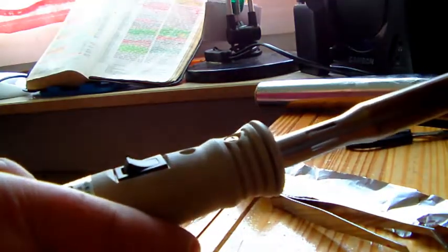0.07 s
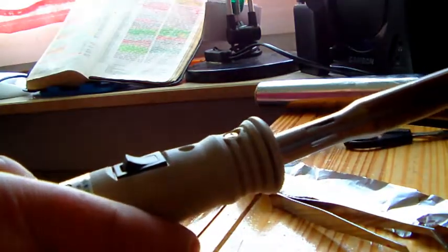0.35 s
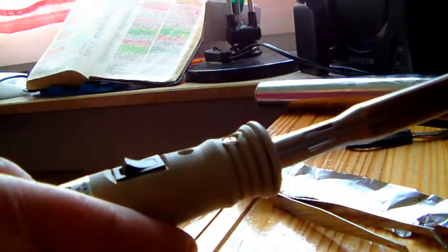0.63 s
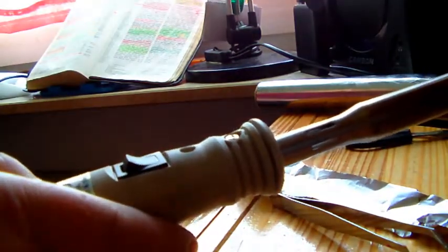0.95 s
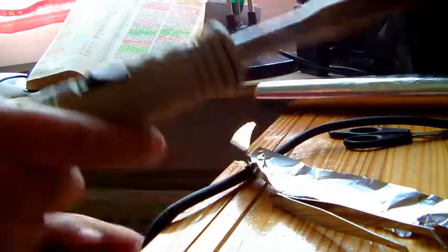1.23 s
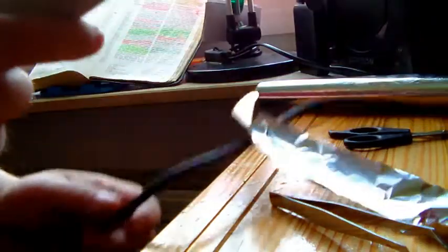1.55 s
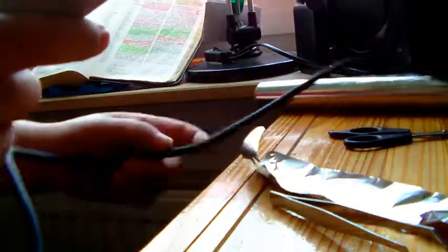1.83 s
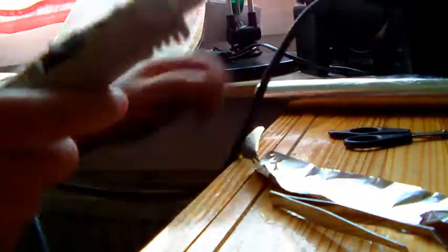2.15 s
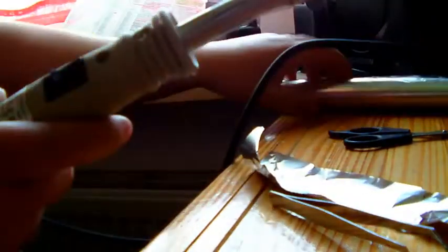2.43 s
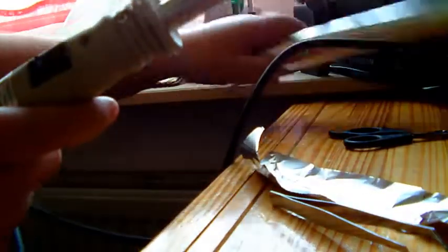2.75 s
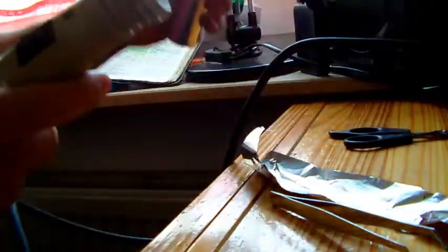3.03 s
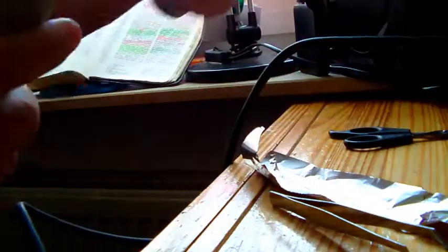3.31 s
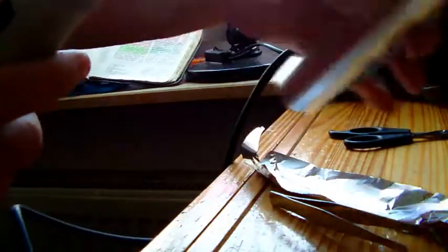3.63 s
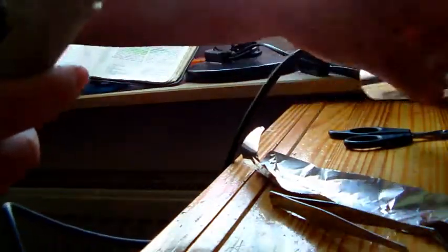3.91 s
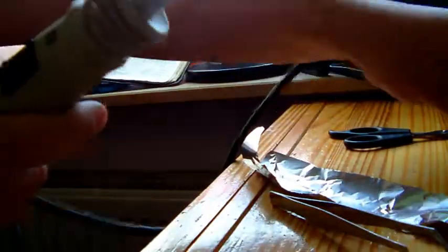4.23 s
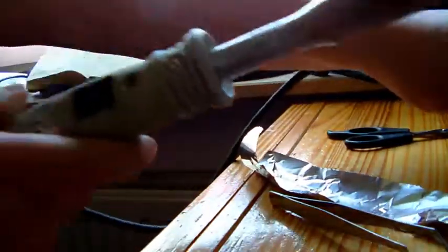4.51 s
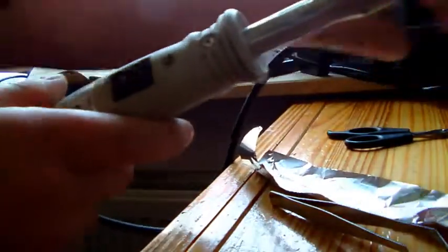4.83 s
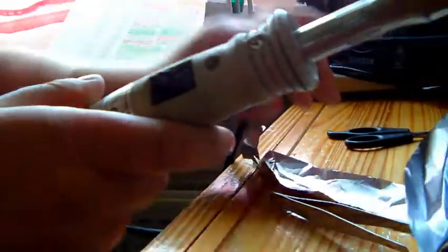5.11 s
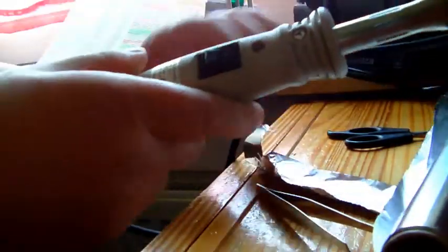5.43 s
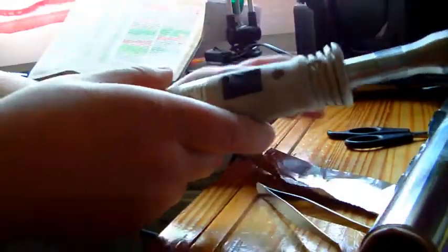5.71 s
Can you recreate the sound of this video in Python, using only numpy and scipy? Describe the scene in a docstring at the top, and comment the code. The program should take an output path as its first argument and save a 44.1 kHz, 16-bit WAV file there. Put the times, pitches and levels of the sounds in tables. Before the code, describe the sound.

In a small room, heard from close by, aluminium foil ticks and crackles as a cord brushes it. A wooden thud leads into louder crinkling as a foil roll is lifted. Its cardboard core gives one hollow tap, then the roll lands with quick rocking knocks and slides briefly amid more crisp snaps. A computer fan hums softly throughout.

```python
"""Foil at a wooden desk

A soldering iron's cord drags over aluminium foil, which buckles in snaps, crumples and faint ticks.
A foil roll is picked up, crinkles in the hand, bumps a shelf, rocks on the desk and slides along it;
the wood thuds and the cardboard core rings. A small computer fan spins up and hums.
Small room, close microphone."""
import sys
import numpy as np
from scipy import signal
from scipy.fft import rfft, irfft, next_fast_len
from scipy.io import wavfile
from scipy.ndimage import map_coordinates

SR = 44100
rng = np.random.default_rng(int(sys.argv[2]) if len(sys.argv) > 2 else 0)


def store_pcm(level_fs):
    """Save levels as 16-bit WAV."""
    pcm = np.round(np.clip(level_fs, -1, 1) * 32767).astype(np.int16)
    wavfile.write(sys.argv[1], SR, np.atleast_2d(pcm).T)


N = 254016
TIME_S = np.arange(N) / SR

# Spectra of fan air, rubbed wood and foil. Each row: frequency in Hz, relative level in dB.
AIR_SPECTRUM = [(30, -29.5), (140, -29), (200, -3), (420, 1.5), (750, 2.5), (1050, -5.5), (1350, -0.5),
                (2400, -11), (2850, -5), (3250, -11), (8000, -17), (11500, -19.5), (13000, -25.5),
                (15500, -17)]
WOOD_SPECTRUM = [(200, -18), (450, 5), (700, 2.5), (1300, 1), (2000, -4.5), (3500, -6), (8000, -14.5)]
FOIL_SPECTRUM = [(30, -27), (150, -27), (400, -20), (1000, -18), (2000, -17.5), (3500, -13), (5500, -8),
                 (6800, -6), (7700, -2), (8800, -2.5), (10500, -9), (12000, -14.5), (13200, -23.5),
                 (15500, -14.5)]
# Strokes over wood. Each row: peak time in seconds, level in dB, rise and fall in seconds per 13 dB.
WOOD_STROKES = [(0.084, -59, 0.027, 0.085), (1.474, -51.5, 0.096, 0.039), (2.012, -50, .008, 0.062),
                (2.217, -36, 0.0018, 0.039), (5.225, -46, 0.047, 0.062), (5.292, -41.5, 0.044, 0.11)]
# Blows on desk and shelf. Each row: start in seconds, peak in dB, pitch in Hz, spread in octaves.
WOOD_KNOCKS = [(1.408, -44, 735, 0.48), (1.455, -43, 743, 0.056), (1.482, -44.5, 740, 0.063),
               (1.597, -38.5, 860, 1.04), (1.856, -28.5, 730, 1.02), (1.864, -37, 840, 0.77),
               (2.2175, -18.5, 396, 0.62), (2.254, -32.5, 383, 0.48), (5.271, -35, 715, .35),
               (5.287, -33, 1120, 0.88)]
# The roll, set down and rocking. Each row: start in seconds, first peak in dB, first gap in seconds,
# hand push in dB per rock, damping in dB per rock squared.
ROLL_ROCKINGS = [(4.2596, -20, .063, 8, 5.0), (4.566, -25, .054, 3, 3.04)]
# Taps on the cardboard core. Each row: start in seconds, peak in dB.
TUBE_TAPS = [(3.0622, -24)]
# Core modes. Each row: frequency in Hz, relative level in dB, ungripped T60 in seconds.
TUBE_MODES = [(697, -8.5, 0.24), (714, -7, 0.058), (812, 5, 0.073), (862, 2, 0.11), (926, 3, 0.056),
              (1080, -14, 0.11), (1640, -10, 0.09), (1867, -11, 0.12), (2260, -5.5, 0.047),
              (2524, -8, 0.034), (3080, -8, 0.039)]
# Foil colour. Each row: time in seconds, tilt at -37 dB in dB per octave, top treble gain in dB.
FOIL_COLOUR = [(1.4, 5.5, 4), (1.6, -0.5, 1), (1.85, -5.5, 0), (2.05, -2, -7), (2.35, -4.5, 5),
               (2.9, -1, -1.5), (3.4, 0, 4), (3.7, -3, -0.5), (4.299, -1.5, 2.5), (4.499, -0.5, 4),
               (5.0, 0, 0), (5.15, -3, 0.5), (5.3, 0, -0.5), (5.55, 1.5, 5.5)]
# Spells of settling foil. Each row: start in seconds, end in seconds, level in dB.
SETTLING_SPELLS = [(1.358, 1.55, -49), (2.249, 2.6, -34.5), (2.699, 3.02, -45.5), (3.074, 3.22, -51),
                   (3.289, 3.65, -49), (3.723, 4.2, -64), (4.471, 4.68, -45), (4.726, 4.96, -64),
                   (5.324, 5.62, -55)]
# Runs of buckles. Each row: centre in seconds, level in dB, Gaussian sigma in seconds.
FOIL_CRUMPLES = [(1.379, -52, 0.015), (1.471, -47.5, 0.031), (1.614, -27.5, 0.0061), (1.792, -40.5, 0.011),
                 (1.81, -35.5, 0.011), (2.034, -49.5, 0.017), (2.224, -22.5, 0.0049), (2.272, -30, 0.0044),
                 (2.338, -31, 0.015), (2.379, -20.5, 0.011), (2.399, -15, 0.01), (2.43, -20, 0.0047),
                 (2.544, -37, 0.041), (2.643, -23, 0.0096), (2.866, -33.5, 0.0028), (2.901, -35.5, 0.0063),
                 (3.45, -42, 0.02), (3.464, -29, 0.0053), (3.654, -46.5, 0.0046), (4.277, -36, .013),
                 (4.368, -43.5, 0.058), (4.49, -47.5, 0.022), (4.578, -32.5, 0.0066), (4.645, -38.5, 0.019),
                 (5.009, -38.5, 0.023), (5.133, -21.5, 0.0099), (5.215, -25.5, 0.0033),
                 (5.305, -41.5, 0.034), (5.415, -38.5, 0.0086), (5.534, -32.5, 0.0051)]
# Single buckles. Each row: start in seconds, level in dB.
FOIL_SNAPS = [(1.6013, -28), (1.7758, -41.5), (1.8545, -39.5), (2.0031, -44), (2.2125, -27.5),
              (2.367, -17.5), (2.5026, -32.5), (2.7259, -50), (2.8306, -43.5), (2.8973, -27),
              (2.9257, -32.5), (3.0057, -46.5), (3.0591, -32.5), (3.1563, -45.5), (3.201, -43),
              (3.295, -42), (3.3536, -48), (3.4056, -46), (3.543, -38.5), (3.5733, -47), (3.6118, -40.5),
              (3.7219, -46.5), (4.2582, -33.5), (4.3096, -35), (4.3619, -32), (4.4106, -33.5),
              (4.4824, -32), (4.5414, -36), (4.5979, -35), (4.7586, -53.5), (4.8487, -49), (4.9903, -30),
              (5.0582, -39.5), (5.1125, -29.5), (5.1395, -18.5), (5.1867, -27), (5.2239, -18.5),
              (5.3702, -37), (5.4098, -31), (5.4379, -38), (5.474, -29), (5.5165, -29), (5.5697, -40.5),
              (5.608, -31.5), (5.6767, -49)]
# Room decay. Each row: frequency in Hz, T60 in seconds.
ROOM_DECAY = [(200, 0.32), (450, 0.19), (1000, 0.21), (4000, 0.3), (9000, 0.14), (15000, 0.16)]
# Microphone dips. Each row: centre in Hz, width in Hz, depth from 0 to 1.
MIC_DIPS = [(308, 39, 0.85), (892, 55, 0.74)]


def amp(db):
    """Decibels to gain."""
    return 10 ** (np.asarray(db) / 20)


def unit(x):
    """Scale to rms 1."""
    return x / np.sqrt(np.mean(x ** 2) + 1e-20)


def along(points, hz):
    """Interpolate (Hz, value) points on a log axis."""
    knots_hz, values = np.transpose(points)
    return np.interp(np.log(hz + 1), np.log(knots_hz + 1), values)


def wobble(steps):
    """Smooth random curve, one knot per whole step."""
    return map_coordinates(rng.standard_normal(int(steps[-1]) + 4), [steps])


def filtered(x, response):
    """Apply a complex frequency response."""
    size = next_fast_len(len(x) + SR // 10)
    return irfft(rfft(x, size) * response(np.fft.rfftfreq(size, 1 / SR)), size)[:len(x)]


def resonance(hz, centre_hz, width_hz):
    """Causal ringing peak of gain 1."""
    return 1j * hz * width_hz / (centre_hz ** 2 - hz ** 2 + 1j * hz * width_hz)


def add(track, start_s, sound):
    """Mix a sound into the track."""
    part = track[max(round(start_s * SR), 0):][:len(sound)]
    part += sound[:len(part)]


def in_room(sound, wet_db, onset_s=0.0078):
    """Direct sound plus a fresh room tail, which starts with the nearest wall."""
    hz, t, noise = signal.stft(rng.standard_normal(SR // 3), SR, nperseg=256)
    decay = amp(-60 * t / along(ROOM_DECAY, hz)[:, None])
    tail = signal.istft(noise * decay, SR, nperseg=256)[1]
    tail *= 1 - np.exp(-(np.arange(len(tail)) / SR / onset_s) ** 2)
    response = amp(wet_db) * tail / np.linalg.norm(tail)
    response[0] = 1
    return signal.fftconvolve(sound, response)


def fan(start_hz=179, full_hz=215.4, spin_tau_s=.78, hum_tau_s=.45, waver_hz=.2):
    """Blade tone climbs over rushing air; its fourth harmonic sweeps through a case resonance."""
    approach = lambda first, last, tau_s: last + (first - last) * np.exp(-TIME_S / tau_s)
    hum_db = approach(-72.5, -59.8, hum_tau_s)
    air_db = approach(-66.5, -62.5, spin_tau_s)
    blade_hz = approach(start_hz, full_hz, spin_tau_s) + waver_hz * wobble(TIME_S * 6)
    phase = 2 * np.pi * np.cumsum(blade_hz) / SR
    case_gain = amp(-9) * np.abs(resonance(4 * blade_hz, centre_hz=797, width_hz=16))
    blades = np.sin(phase) + amp(-15) * np.sin(2 * phase) + amp(-25.5) * np.sin(3 * phase)
    blades += case_gain * np.sin(4 * phase)
    air = unit(filtered(rng.standard_normal(N), lambda hz: amp(along(AIR_SPECTRUM, hz))))
    return amp(hum_db + 0.33 * wobble(TIME_S * 8)) * unit(blades) + amp(air_db) * air


def slide(judder_db=2.0, judder_per_s=130):
    """Hand, cord and roll catch and slip on the wood grain; each stroke swells and dies."""
    envelope = sum(amp(db - 13 * np.maximum((peak_s - TIME_S) / rise_s, (TIME_S - peak_s) / fall_s))
                   for peak_s, db, rise_s, fall_s in WOOD_STROKES)
    rub = unit(filtered(rng.standard_normal(N), lambda hz: amp(along(WOOD_SPECTRUM, hz))))
    return envelope * unit(rub * amp(judder_db * wobble(TIME_S * judder_per_s)))


def dispersed(x, lag_s=.009):
    """Low bending waves travel slower, so a blow arrives as a falling chirp."""
    delay_s = lambda hz: lag_s * (430 / np.maximum(hz, 160)) ** 1.3
    return filtered(x, lambda hz: np.exp(-2j * np.pi * np.cumsum(delay_s(hz)) * hz[1]))


def bumps(boom_db=-3.5, reference_hz=426, boom_db_per_oct=-12.5, click_db=-41):
    """Single blows, as rows for knocks(); higher ones boom less."""
    return [(start_s, db, hz, spread_oct, boom_db + boom_db_per_oct * np.log2(hz / reference_hz),
             click_db) for start_s, db, hz, spread_oct in WOOD_KNOCKS]


def contact_s(start_s, gap_s, k, gap_ratio=.74):
    """Time of contact k of a roll that rocks ever faster."""
    return start_s + gap_s * (1 - gap_ratio ** k) / (1 - gap_ratio)


def rocks(pitch_hz=415, spread_oct=0.28, boom_db=-3, boom_loss_db=6, click_db=-28.5, click_loss_db=9):
    """Contacts of the rocking roll, as rows for knocks(); boom and click fade with each."""
    return [(contact_s(start_s, gap_s, k), db + push_db * k - damping_db * k ** 2,
             pitch_hz, spread_oct, boom_db - boom_loss_db * k, click_db - click_loss_db * k)
            for start_s, db, gap_s, push_db, damping_db in ROLL_ROCKINGS for k in range(5)]


def knocks():
    """Each blow drives a broad band of the board, its low boom, a higher ring and a contact click."""
    out, blow = np.zeros(N), signal.unit_impulse(SR // 4, SR // 50)
    band = lambda hz, centre_hz, spread_oct: np.exp(-(np.log2((hz + 1) / centre_hz) / spread_oct) ** 2)
    boom = lambda hz: resonance(hz, centre_hz=203, width_hz=28) * band(hz, 203, spread_oct=.4)
    ring = lambda hz: amp(-21) * resonance(hz, centre_hz=690, width_hz=24)
    click = lambda hz: band(hz, centre_hz=1650, spread_oct=0.7)
    for start_s, db, pitch_hz, spread_oct, boom_db, click_db in bumps() + rocks():
        board = lambda hz: (band(hz, pitch_hz, spread_oct) + amp(boom_db) * boom(hz)
                            + ring(hz) + amp(click_db) * click(hz))
        thud = dispersed(filtered(blow, board))
        thud *= amp(db) / np.abs(thud).max()
        add(out, start_s - blow.argmax() / SR, in_room(thud, wet_db=-9, onset_s=0.0031))
    return out


def landings(offset_db=-17, loss_db=2.5):
    """The first contacts of the rocking roll, as taps for tube()."""
    return [(contact_s(start_s, gap_s, k), db + offset_db - loss_db * k)
            for start_s, db, gap_s, _, _ in ROLL_ROCKINGS for k in range(3)]


def tube(rise_s=0.0004, held_cutoff_hz=550, lying_cutoff_hz=1300, grip_db_per_s=250):
    """Taps ring the hollow core, damped by the grip; on the desk it loses its low modes."""
    out, t = np.zeros(N), np.arange(SR // 4) / SR
    modes = sum((-1) ** k * amp(db - 60 * t / t60_s) * np.sin(2 * np.pi * hz * t)
                for k, (hz, db, t60_s) in enumerate(TUBE_MODES))
    ring = modes * amp(-grip_db_per_s * t) * (1 - np.exp(-t / rise_s))
    for taps, cutoff_hz in (TUBE_TAPS, held_cutoff_hz), (landings(), lying_cutoff_hz):
        highpass = lambda hz: 1 - 1 / (1 + (hz / cutoff_hz) ** 5)
        pock = dispersed(filtered(ring, highpass), lag_s=.006)
        for start_s, db in taps:
            add(out, start_s, in_room(amp(db) * pock / np.abs(pock).max(), wet_db=-12))
    return out


def patch(at_s, db, reference_db=-37, tilt_per_db=0.3769, scatter_oct=0.027):
    """Tilt, main resonance and top treble of a buckling foil patch: the harder, the brighter."""
    times_s, tilts, tops_db = np.transpose(FOIL_COLOUR)
    tilt_db_oct = np.interp(at_s, times_s, tilts) + tilt_per_db * (db - reference_db)
    facet_hz = 7930 * 2 ** (scatter_oct * rng.standard_normal())
    return tilt_db_oct, facet_hz, np.interp(at_s, times_s, tops_db)


def crackle(count, tilt_db_oct, facet_hz, top_db, scatter_db, per_s=12000, ripple_db=2.0, ripple_hz=250):
    """Tiny buckles ring a foil patch with one main resonance and many weak ones."""
    buckles = (rng.random(count) < per_s / SR) * rng.choice([-1, 1], count)
    buckles = buckles * amp(scatter_db * rng.standard_normal(count))
    weak_modes = rng.standard_normal(256)

    def colour(hz):
        db = along(FOIL_SPECTRUM, hz) + tilt_db_oct * np.log2(np.clip(hz, 2600, 8000) / 8000)
        # the brightest buckles gather in the main resonance, not above it
        db -= 0.91 * max(tilt_db_oct, 0) * np.log2(np.clip(hz, 8000, 12000) / 8000)
        db += top_db * (1 + np.tanh((hz - 11300) / 1300)) / 2
        db += np.exp(-((hz - facet_hz) / 850) ** 2)  # main resonance, 1 dB
        db += ripple_db * map_coordinates(weak_modes, [hz / ripple_hz], mode="wrap")
        return amp(db)
    return unit(filtered(buckles, colour))


def settling(ticks_per_s=70, scatter_db=2):
    """Loosely spaced ticks. Each row: start in seconds, level in dB."""
    rows = []
    for start_s, end_s, db in SETTLING_SPELLS:
        slots_s = np.arange(start_s, end_s, 1 / ticks_per_s)
        for slot_s, (late, size) in zip(slots_s, rng.random(size=(64, 2))):
            rows.append((slot_s + late / ticks_per_s, db + scatter_db * np.log(-np.log(size))))
    return rows


def ticks(t60_s=0.024, rise_s=0.00038, gain_db=3.0):
    """Small facets of settling foil flip back, each with its own colour."""
    out, t = np.zeros(N), np.arange(SR // 25) / SR
    envelope = amp(gain_db - 60 * t / t60_s) * (1 - np.exp(-t / rise_s))
    for start_s, db in settling():
        tick = crackle(len(t), *patch(start_s, db), scatter_db=3.0, ripple_db=3.5, ripple_hz=600)
        add(out, start_s, in_room(amp(db) * envelope * tick, wet_db=-8))
    return out


def crumples(reference_per_s=9000, reference_db=-30.5, tilt_scale=0.75, muffle_hz=11500, muffle_db=-6.5):
    """Pressure sets off an avalanche of buckles, sparser when gentle; dense, soft buckles give off less top."""
    out, t = np.zeros(N), np.arange(-SR // 6, SR // 6) / SR
    for centre_s, db, sigma_s in FOIL_CRUMPLES:
        tilt_db_oct, facet_hz, top_db = patch(centre_s, db)
        swell = np.exp(-.5 * (t / sigma_s) ** 2)
        per_s = reference_per_s * amp(db - reference_db) ** .5
        run = crackle(len(t), tilt_scale * tilt_db_oct, facet_hz, top_db, scatter_db=4.5, per_s=per_s)
        add(out, centre_s + t[0], in_room(amp(db) * swell * run, wet_db=-11))
    return filtered(out, lambda hz: amp(muffle_db * (1 + np.tanh((hz - muffle_hz) / 700)) / 2))


def snaps(shiver_t60_s=0.064, crack_t60_s=0.031, rise_s=.0008, hard_db=-21.5):
    """A crease flips with a sharp crack and the sheet shivers after it."""
    out, t = np.zeros(N), np.arange(SR // 12) / SR
    decay = amp(-60 * t / shiver_t60_s) + 0.67 * amp(-60 * t / crack_t60_s)
    envelope = decay * (1 - np.exp(-t / rise_s))
    for start_s, db in FOIL_SNAPS:
        tilt_db_oct, facet_hz, top_db = patch(start_s, db)
        tilt_db_oct += 0.7 + 2.8 * max(db - hard_db, 0)  # hard snaps brighten faster
        shiver = crackle(len(t), tilt_db_oct, facet_hz, top_db, scatter_db=0.0)
        add(out, start_s, in_room(amp(db) * envelope * shiver, wet_db=-10))
    return out


def scene():
    """Desk, roll and foil over the fan, mono."""
    return (fan() + slide() + knocks() + tube() + crumples() + snaps() + ticks())[None]


def record(dry):
    """Microphone: two narrow dips and a 15.9 kHz band limit."""
    dips = lambda hz: np.prod([1 - min(depth, 1) * np.exp(-((hz - centre_hz) / width_hz) ** 2)
                               for centre_hz, width_hz, depth in MIC_DIPS], axis=0)
    lowpass = lambda hz: .5 - .5 * np.tanh((hz - 15900) / 130)
    return filtered(dry[0], lambda hz: dips(hz) * lowpass(hz))[None]


dry = scene()
out = record(dry)
store_pcm(out)
```